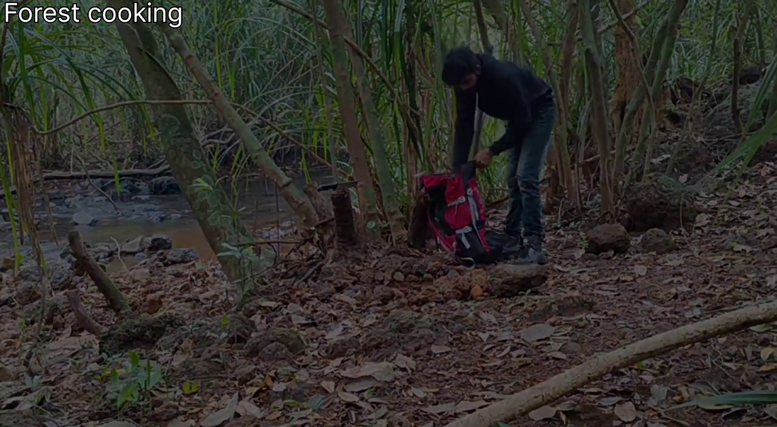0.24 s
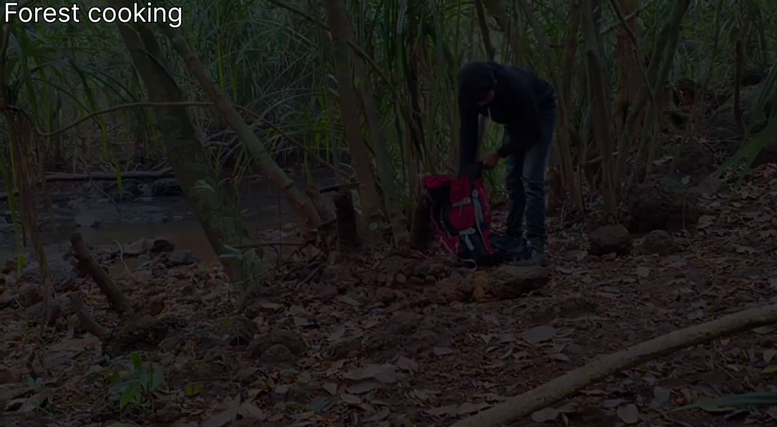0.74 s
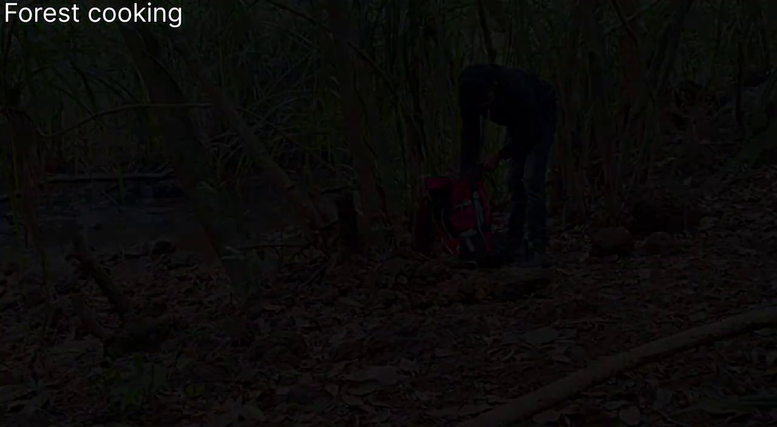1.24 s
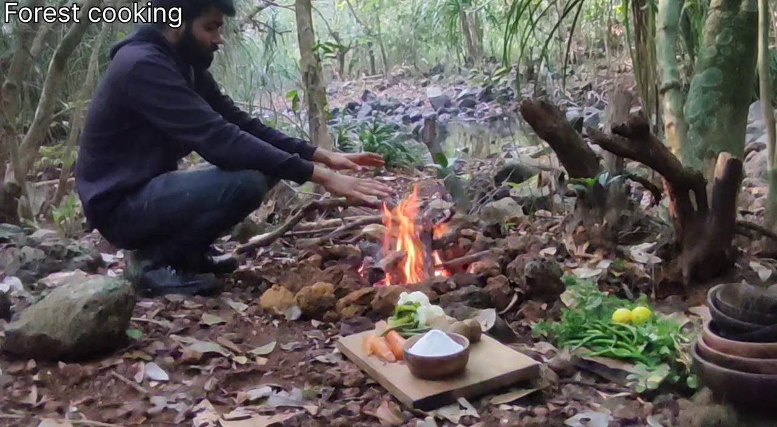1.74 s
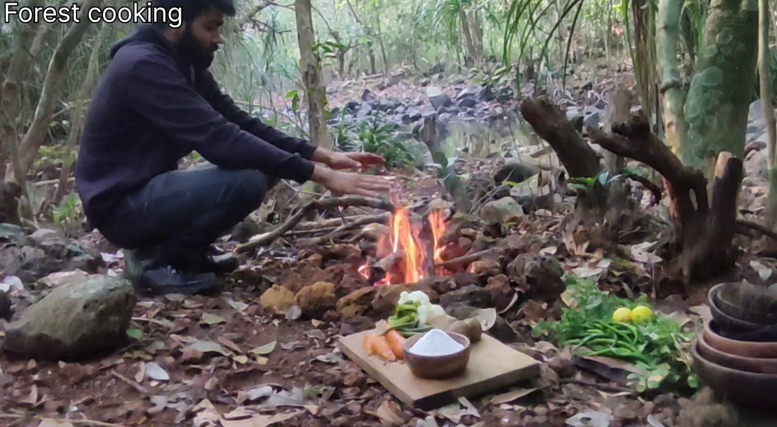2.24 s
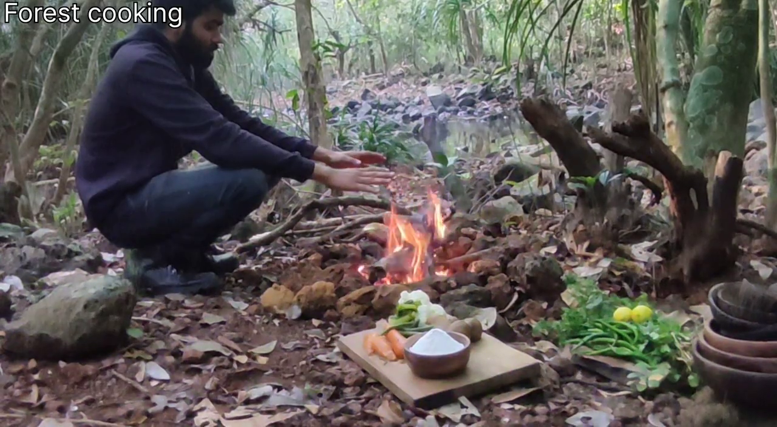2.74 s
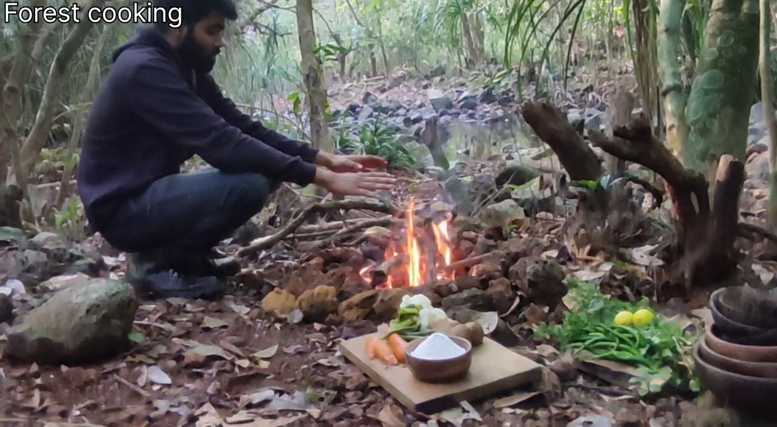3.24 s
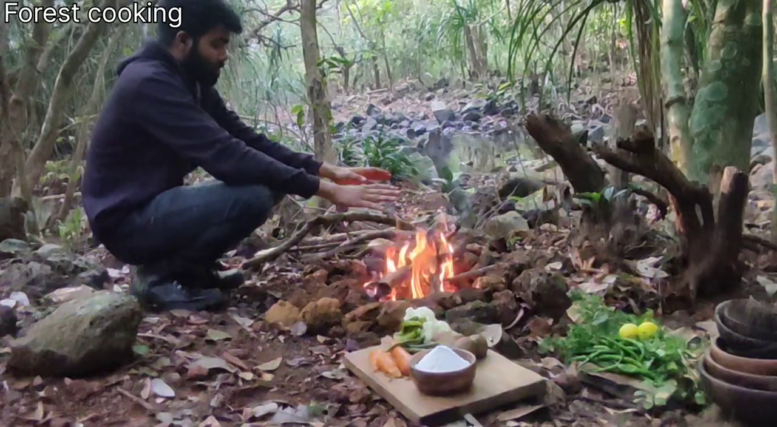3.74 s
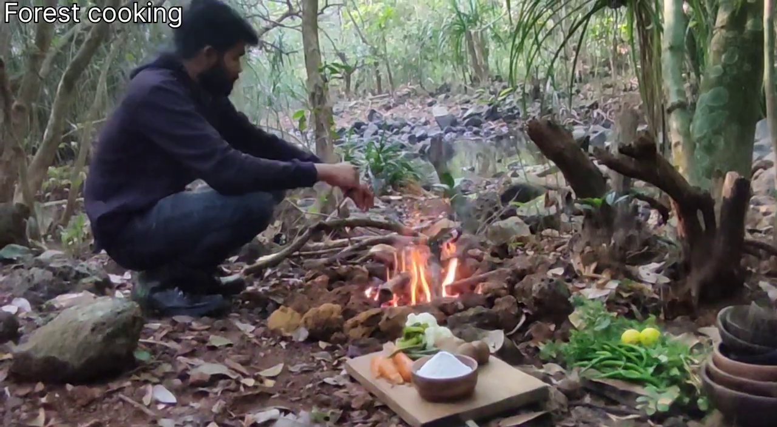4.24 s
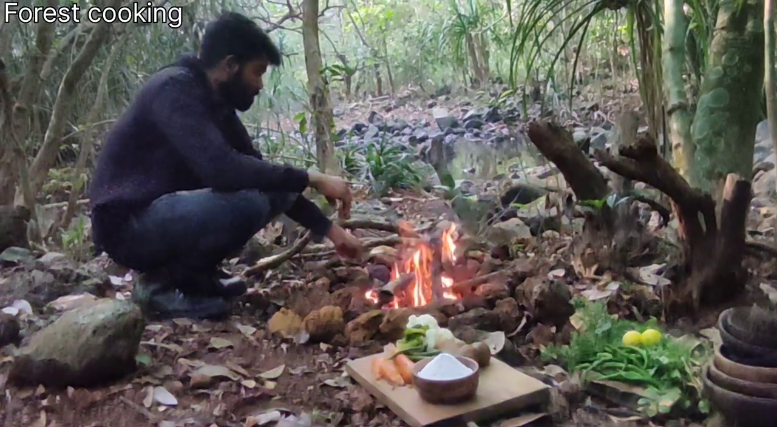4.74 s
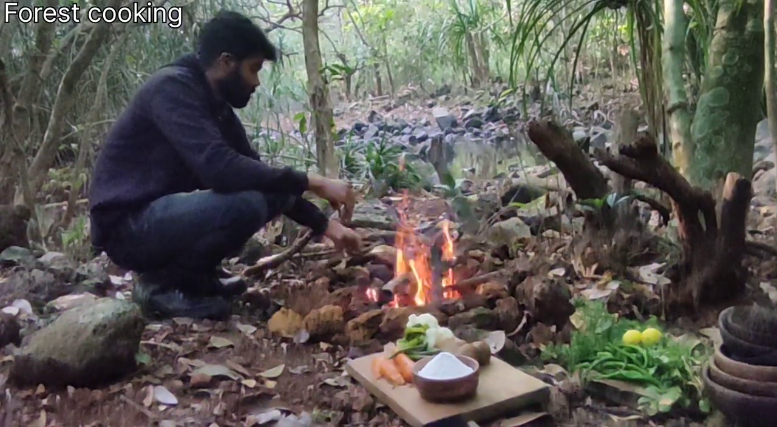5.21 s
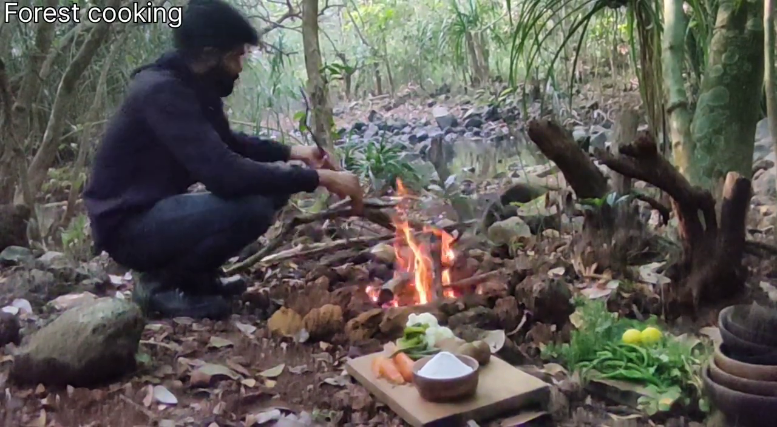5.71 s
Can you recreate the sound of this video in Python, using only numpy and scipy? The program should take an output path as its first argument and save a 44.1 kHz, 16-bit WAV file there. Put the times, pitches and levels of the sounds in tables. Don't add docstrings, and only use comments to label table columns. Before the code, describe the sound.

Thin, bright insect chorus and soft water noise fill a quiet forest, picked up by a small stereo microphone near the ground. The sound drops out briefly before two seconds and quickly fades back with surging insects. Far birds whistle and chirp, a small nearby fire flutters and ticks, and finally much louder hollow wooden knocks and crisp leaf scraping burst in close.

```python
import sys
import numpy as np
from scipy import signal
from scipy.io import wavfile
from scipy.ndimage import uniform_filter1d

SR = 44100
rng = np.random.default_rng(int(sys.argv[2]) if len(sys.argv) > 2 else 0)


def store_pcm(level_fs):
    pcm = np.round(np.clip(level_fs, -1, 1) * 32767).astype(np.int16)
    wavfile.write(sys.argv[1], SR, np.atleast_2d(pcm).T)


def volts_from_db(level):
    exponent = np.asarray(level, float) / 20
    return 10 ** exponent


N = 263277


def rms_one(x):
    return x / np.sqrt(np.mean(x ** 2) + 1e-20)


def in_time(rows, span):
    s, *columns = np.transpose(rows)
    t = np.arange(round(span[0] * SR), round(span[1] * SR)) / SR
    return [np.interp(t, s, column) for column in columns]


def at_hz(points, hz):
    points = np.array(points)
    return np.interp(np.log(hz), np.log(np.maximum(points[:, 0], 1)), points[:, 1])


def sides(left_right_db):
    return volts_from_db(np.multiply.outer([.5, -.5], left_right_db))


def steady(span, rows):
    t = np.arange(round(span[1] * SR) - round(span[0] * SR)) / SR
    return [db + per_s * t for db, per_s in rows]


def drift(rate, size):
    r = np.exp(-80 * np.pi * rate / SR)
    slow = signal.lfilter([1], [1, -2 * r, r * r], rng.standard_normal((2, size // 40 + 1002)))
    slow = slow[:, 1000:]
    return np.array([np.interp(np.arange(size) / 40, np.arange(len(row)), rms_one(row)) for row in slow])


def ring(x, hz, t60):
    r, w = volts_from_db(-60 / (t60 * SR)), 2 * np.pi * hz / SR
    return signal.lfilter([1, 0, -1], [1, -2 * r * np.cos(w), r * r], x + 1e-18)


def band(x, low_hz, high_hz):
    return signal.sosfilt(signal.butter(2, [low_hz, high_hz], "band", fs=SR, output="sos"), x)


def add(out, s, x):
    i = round(s * SR)
    out[:, i:i + x.shape[1]] += x[:, :N - i]


def wash(spectrum, like, lean, size, patchy_db, count):
    out = 0
    edges = np.geomspace(spectrum[1][0] / 1.322, spectrum[-3][0] * 1.143, count + 1)
    white = rng.standard_normal((2, 2, size))
    together = 0.76 * drift(3.36, size)[0]
    for k, (low, high) in enumerate(zip(edges, edges[1:])):
        mid, side = band(white[k % 2], low, high)
        hz = np.sqrt(low * high)
        alike = np.clip(at_hz(like, hz), -1, 1)
        flicker_db = patchy_db * (drift(14.8, size) + together)
        gain = volts_from_db(at_hz(spectrum, hz) + flicker_db) * sides(at_hz(lean, hz))[:, None]
        out = out + gain * (np.sqrt(1 + alike) * mid + np.sqrt(1 - alike) * side * [[1], [-1]])
    return rms_one(out)


# pitch_hz, level_db (per Hz)
RUMBLE_A = [(7.1, -37), (12, -2), (60, -16.5), (168, -24), (257, -28), (450, -32.5), (580, -66),
            (990, -120)]
RUMBLE_B = [(7.1, -6), (12, -14.5), (19, -1), (33, -6.5), (156, -12.5), (450, -37.5), (580, -66),
            (990, -120)]
# pitch_hz, level_db (per Hz)
STREAM_A = [(210, -16), (350, -21), (411, -30), (568, -1.5), (1150, -2), (2750, -3.5), (5500, -5),
            (7150, -35), (12100, -120)]
STREAM_B = [(180, -14), (300, -9.5), (333, -7), (879, -3.5), (1090, -2.5), (1340, -6.5), (2320, 0.5),
            (3290, -6), (4900, -2), (6370, -36), (10800, -120)]
# pitch_hz, level_db (per Hz)
LEAF_HISS = [(5000, -42), (7400, 5), (8600, 3), (10000, -1), (13000, 1), (15400, 0), (16500, -24),
             (17000, -40)]
# pitch_hz, likeness (-1 to 1)
LIKE_A = [(60, 0.36), (240, 0.46), (950, -0.17), (3770, 0.032), (15000, 0.005)]
LIKE_B = [(60, 0.81), (240, 0.65), (950, -0.011), (3770, -0.13), (15000, 0.019)]
# pitch_hz, left_right_db
LEAN_A = [(60, -1.2), (180, 0.07), (550, -0.52), (1650, 1.0), (4970, 0.079), (15000, -0.076)]
LEAN_B = [(60, -1), (180, 1.5), (550, -1), (1650, 4.5), (4970, 0), (15000, -1)]
# level_db, trend_db_per_s
AIR_A = [
    (-61.5, -2.5),
    (-69, 0.23),
    (-75, 1.4),
]
AIR_B = [
    (-65.5, 0.079),
    (-67.5, 0.19),
    (-75, 0.0093),
]
# time_s, change_db
GUSTS = [(0, 4.5), (.4, 1), (1.25, -1.5), (1.7, 1.5), (1.77, -7.5), (2.2, 3.5), (2.54, -0.2), (2.8, 1.5),
         (3.25, 2.5), (3.55, 1.7), (3.95, -0.9), (4.7, 3), (5.03, 0.1), (5.48, 2.2), (5.68, 2), (5.97, 5.5)]
STREAM_FOLLOWS, HISS_FOLLOWS = 0.67, 0.81
BREEZE_DB = -57


def air(span, levels, rumble, stream, like, lean):
    rumble_db, stream_db, hiss_db = steady(span, levels)
    (gust_db,) = in_time(GUSTS, span)
    size = len(hiss_db)
    low = volts_from_db(rumble_db + 7.0) * wash(rumble, like, lean, size, patchy_db=3.0, count=6)
    stream_gain = volts_from_db(stream_db + STREAM_FOLLOWS * gust_db + 7.0)
    middle = stream_gain * wash(stream, like, lean, size, patchy_db=2.0, count=11)
    hiss_gain = volts_from_db(hiss_db + HISS_FOLLOWS * gust_db + 10.0)
    high = hiss_gain * wash(LEAF_HISS, like, lean, size, patchy_db=1.5, count=10)
    breeze = volts_from_db(BREEZE_DB) * drift(6.2, size)
    return low + middle + high + breeze


def note(s, length, hz, db, lean_db, shape):
    attack, release, edge_db, sag_db, glide = shape
    at = np.maximum.accumulate([0, attack, length - release, length])
    level_db = db - np.array([edge_db, 0, sag_db, sag_db + edge_db])
    return np.transpose([s + at, hz + glide * at, level_db, lean_db + 0 * at])


def bird(rows, overtones, rough, flutter):
    hz, level_db, lean_db = in_time(rows, (rows[0][0], rows[-1][0]))
    phase, size = 2 * np.pi * np.cumsum(hz) / SR, len(hz)
    from_end = np.minimum(np.arange(size), np.arange(size)[::-1])
    fade = np.minimum(1, from_end / (0.0041 * SR))
    out = 0
    for multiple, db in overtones:
        scattered = 1 - rough + rough * (drift(flutter, size) + 1j * drift(flutter, size))
        turning = np.exp(1j * (round(multiple) * phase + [[0], [1.9]]))
        out = out + volts_from_db(db) * np.real(scattered * turning)
    return np.sqrt(2) * volts_from_db(level_db + 5.5) * fade * sides(lean_db) * out


# start_s, length_s, pitch_hz, level_db, left_right_db
HOOT = [
    (0.13, .33, 574, -64, 19),
]
# multiple, level_db
HOOT_OVERTONES = [
    (1, -4),
    (2, -12.5),
    (3, -18.5),
]
# start_s, length_s, pitch_hz, level_db, left_right_db
PIPES = [(.44, .12, 1140, -77, 11), (.54, .14, 1150, -77, 8), (.095, .04, 1285, -70, 9),
         (2.814, 0.03, 1520, -59.5, 8), (2.842, 0.044, 1540, -60, 5), (2.918, 0.042, 1517, -69, -6),
         (2.975, 0.068, 1520, -70, 3), (2.922, 0.034, 2985, -64, -4), (2.97, 0.071, 2970, -67.5, -2),
         (3.038, 0.029, 3140, -61, -7), (3.062, 0.024, 3100, -66, -4), (3.085, 0.03, 3120, -66, -3),
         (3.074, .025, 1855, -66, 0), (3.1, .025, 1860, -70, -1), (3.125, 0.068, 1885, -65.5, 7),
         (3.17, 0.049, 1885, -63, 4), (3.217, 0.076, 1940, -63.5, 4), (3.287, 0.035, 1935, -64, 3),
         (3.318, .025, 1930, -64, 0), (3.345, 0.034, 1890, -65, 1), (3.4, 0.05, 1920, -74, 5),
         (5.345, .03, 1220, -70, -4), (5.362, 0.036, 1135, -63.5, 2), (5.388, 0.037, 1130, -63, -2),
         (5.425, .035, 1147, -63, 0), (5.452, 0.037, 1175, -61, 4), (5.492, 0.047, 1173, -68, 3),
         (5.565, 0.031, 1170, -71, 10)]
# start_s, length_s, pitch_hz, level_db, left_right_db
CHIRPS = [
    (2.11, 0.11, 3710, -54, -1),
    (3.476, 0.076, 3420, -57.5, -8),
    (3.475, 0.1, 4120, -54.5, 4),
    (3.725, 0.093, 2380, -55.5, 11),
    (3.781, 0.1, 2480, -57.5, 10),
]
# attack_s, release_s, edge_db (under top), sag_db, glide_hz_per_s
HOOT_SHAPE = (.2, .06, 15, 5, -35)
PIPE_SHAPE = (.01, .012, 12, 2, -60)
CHIRP_SHAPE = (0.024, 0.023, 20, 6.8, 290)


def distant_birds():
    out = np.zeros((2, N))
    for row in HOOT:
        add(out, row[0], bird(note(*row, HOOT_SHAPE), HOOT_OVERTONES, rough=0.33, flutter=18))
    for row in PIPES:
        add(out, row[0], bird(note(*row, PIPE_SHAPE), [(1, 0)], rough=0.36, flutter=80))
    for row in CHIRPS:
        chirp = bird(note(*row, CHIRP_SHAPE), [(1, 0)], rough=0.73, flutter=240)
        add(out, row[0], volts_from_db(-11.5) * chirp)
    return out


# start_s, peak_db, pitch_hz
FLAPS = [(1.842, -50.5, 132), (1.944, -48.5, 75.4), (2.045, -57, 72.7), (2.382, -53, 72.7),
         (2.592, -48, 108), (2.84, -56, 75.4), (3.139, -53, 108), (3.467, -56, 143), (3.632, -55, 118),
         (3.739, -52, 129), (4.126, -55, 72.7), (4.38, -54, 113), (4.475, -54, 118), (4.57, -60, 96.9),
         (4.667, -52, 88.8), (5.005, -48, 165), (5.319, -53, 108), (5.515, -52, 86.1), (5.663, -60, 72.7),
         (5.773, -53, 72.7)]
FLAP_CYCLES, FLAP_DB = 4.8, -3.5


def flame():
    out = np.zeros((2, N))
    for s, peak_db, hz in FLAPS:
        t = np.arange(SR // 8) / SR
        age = t * hz / FLAP_CYCLES * np.log(1000)
        puff = np.e * age * np.exp(-age) * np.sin(2 * np.pi * hz * t)
        add(out, s - .003, volts_from_db(peak_db + FLAP_DB) * puff * np.ones((2, 1)))
    return out


def snap(peak_db, top_db, dull_db, lean_db):
    tail_s, echo_db = .075, -12
    t = np.arange(SR // 5) / SR
    echoes = volts_from_db(echo_db - 60 * t / tail_s) * np.minimum(1, t / 0.0042)
    shape = volts_from_db(-60 * t / 0.0073) + echoes
    noise = rng.standard_normal(len(t)) + 2 * rng.standard_normal((2, len(t)))
    burst = shape * noise
    crack = band(burst, 6600, 8500)
    top = volts_from_db(top_db + 2.5) * band(band(burst, 8600, 16000), 11200, 16500)
    dull = volts_from_db(dull_db - 2.5) * band(burst, 2500, 5000)
    return volts_from_db(peak_db) * sides(lean_db)[:, None] * (crack + top + dull)


# start_s, peak_db, top_db, dull_db, left_right_db
SNAPS = [(0.533, -58, -4, -8, 7), (1.802, -60, -24, -10, -0.5), (2.4346, -52, 3, 9, 0),
         (3.6254, -53, -4, -10, -1), (4.218, -56, -5, -9, 6), (4.2295, -51, 2, -8, 0),
         (4.305, -58, -4, -11, -4), (4.453, -52, -13, -8, -4), (4.5084, -72, -2.5, -7, -2),
         (4.7127, -57.5, 5, -5, -1.5), (4.9536, -69, 13, 4, -4), (5.1993, -55, -10, -14, 2),
         (5.75, -55, 2, 6, 5), (5.7745, -44, -8, -6, -4), (5.7768, -34.5, -10, -6, -8),
         (5.7788, -34.5, -21, -6, -8), (5.7845, -44, -15, -9, -3), (5.7897, -34.5, -14, -8, -5),
         (5.968, -32.5, -14, -14, 9)]
# start_s, peak_db, pitch_hz, left_right_db
TICKS = [(2.9, -58, 6500, 8), (2.7302, -58, 7000, 8), (3.7893, -56, 7020, -4), (5.862, -51, 7300, 14),
         (5.875, -60, 7450, 8), (5.198, -57, 9500, 4), (5.199, -65, 10900, 4), (4.2295, -58, 9200, 0),
         (4.317, -65, 10200, -5), (5.889, -58, 8000, 0)]


def fire_and_twigs():
    out = np.zeros((2, N))
    for s, *how in SNAPS:
        add(out, s, snap(*how))
    decay = volts_from_db(-60 * np.arange(SR // 10) / SR / 0.079)
    for s, peak_db, hz, lean_db in TICKS:
        burst = rng.standard_normal((2, SR // 10)) * decay
        add(out, s, volts_from_db(peak_db + 14.5) * band(burst, hz - 600, hz + 600) * sides(lean_db)[:, None])
    return out


STICK_MOVES_S, STICK_LANDS_S = 5.6, 5.776


def stick_on_leaves(since):
    brush_db, crush_db, drag_db, hold_s, fade_db_per_s = -63.5, -48, -58.5, 0.021, 116
    crush_fading_db = crush_db - fade_db_per_s * np.maximum(since - hold_s, 0)
    leaf_db = np.where(since < 0, brush_db, np.maximum(drag_db, crush_fading_db))
    size = len(since)
    grains = (rng.random((2, size)) < 11000 / SR) * rng.normal(0, 1, (2, size))
    rustle = band(band(grains, 5000, 9100), 5000, 8800)
    rustle = rustle + volts_from_db(-10.0) * band(grains, 1630, 5600) + volts_from_db(-11.5) * band(grains, 9000, 14500)
    return volts_from_db(leaf_db + 4.0) * rms_one(rustle) * sides(1.9)[:, None]


# start_s, peak_db, pitch_hz (favoured)
KNOCKS = [(5.698, -61, 640), (5.729, -57, 680), (5.749, -55, 660), (5.762, -57, 680), (5.7795, -40, 680),
          (5.7796, -42, 520), (5.7797, -48, 400), (5.7867, -41.5, 690), (5.798, -52, 710),
          (5.827, -38.5, 700), (5.846, -51, 640), (5.862, -56, 640), (5.873, -46, 640), (5.884, -46.5, 647),
          (5.896, -49, 770), (5.911, -48, 705), (5.924, -45, 676), (5.934, -48, 800), (5.946, -39.5, 765),
          (5.9475, -45, 620), (5.947, -47, 400), (5.96, -43, 630)]
# pitch_hz, level_db, t60_s
LOG = [(400, -14, .03), (550, -14, .04), (635, -9, .08), (695, -8, .05), (765, -10, .055), (1060, -22, .03),
       (1230, -20, .03)]


def stick_on_log(since):
    rub_db = -65.5 + since * np.where(since < 0, 75, 34)
    start_s, peak_db, favoured_hz = np.transpose(KNOCKS)
    at = [round((s - STICK_MOVES_S) * SR) for s in start_s]
    log = 0
    for hz, mode_db, t60 in LOG:
        contact = np.array([np.zeros(len(since)), rng.standard_normal(len(since))])
        miss_db = 0.3 * np.minimum(np.abs(favoured_hz - hz), 150)
        contact[0, at] = volts_from_db(peak_db + 3.0 - miss_db)
        soft = band(band(contact, 370, 800), 360, 1300)
        log = log + volts_from_db(mode_db) * ring(soft, hz, t60)
    knocks = log[0] * volts_from_db(peak_db.max() - 2.5) / np.abs(log[0]).max()
    return knocks + volts_from_db(rub_db) * rms_one(log[1])


def stick():
    since_landing = np.arange(round(STICK_MOVES_S * SR), N) / SR - STICK_LANDS_S
    return stick_on_leaves(since_landing) + stick_on_log(since_landing)


# level_db (at the start of the take), swell_db_per_s
SINGING_A = [(-64.5, 0.9), (-69.5, 0.5), (-70, 0), (-77.5, -8)]
SINGING_B = [(-62.5, 0.63), (-70, 1), (-75, 0.2)]
# time_s, half_length_s, pitch_hz (of the wing), change_db
BOUTS_A = [
    (0.041, 0.11, 6196, 2),
    (1.01, .05, 6196, 1),
    (2.6, 0.02, 6196, 7),
    (1, 0.072, 8200, -6),
]
BOUTS_B = [(1.76, .22, 5880, -6.5), (1.76, .2, 6740, -2.5), (2.118, 0.086, 6740, 12),
           (2.262, 0.13, 6740, 5.5), (2.122, 0.096, 7810, 8), (2.6, .1, 6740, -3), (2.52, 0.097, 7810, 7),
           (2.74, .04, 6740, 4), (2.85, 0.097, 7810, 6), (2.9, 0.036, 6740, 1), (3.01, .03, 6740, -9),
           (3.12, 0.12, 6740, 6), (3.1, 0.081, 7810, 4), (3.24, .06, 5880, 2), (3.66, .03, 6740, -4),
           (3.8, 0.11, 6740, 1.5), (4.13, 0.092, 7810, -7), (4.88, 0.15, 6740, 6), (4.86, 0.08, 7810, 6),
           (4.9, 0.1, 5880, 2), (5.7, 0.45, 7810, 8.5), (5.9, 0.028, 6740, 1)]


def effort(span, groups, singing, bouts):
    levels = steady(span, singing)
    t = span[0] + np.arange(len(levels[0])) / SR
    for s, half, hz, db in bouts:
        k = np.argmin(np.abs(np.array(groups)[:, 0] - hz))
        levels[k] = levels[k] + db * np.exp(-((t - s) / half) ** 2)
    return levels


# pitch_hz, spread_hz, strokes_per_s, left_right_db, t60_s
CHORUS_A = [
    (6230, 303, 520, 0, 0.016),
    (6780, 175, 170, -7, 0.03),
    (7220, 246, 170, 9, 0.023),
    (8060, 300, 490, 6, 0.0046),
]
CHORUS_B = [
    (5880, 363, 260, 1.5, .012),
    (6740, 454, 220, 4, 0.011),
    (7810, 530, 280, 7.1, 0.0062),
]
OVERTONE_DB = -28.5


def chorus(span, groups, levels, count=5):
    out = 0
    for (hz, spread_hz, per_s, lean_db, t60), level_db in zip(groups, levels):
        size, group = len(level_db), 0
        for place in np.linspace(-1, 1, count):
            rate = per_s * rng.uniform(.7, 1.3) * volts_from_db(.8 * rng.standard_normal((2, size // 64 + 1)))
            rate = np.repeat(rate, 64, axis=1)[:, :size]
            cycle = np.cumsum(rate, axis=1) / SR + rng.random((2, 1))
            strokes = np.diff(np.floor(cycle), prepend=0, axis=1) * rng.normal(0, 1, (2, size))
            wing_hz = hz + spread_hz * place
            voice = ring(ring(strokes, wing_hz, t60), wing_hz, t60)
            group = group + rms_one(voice) * volts_from_db(0.77 * drift(4.7, size) - 4.5 * place ** 2)
        group = rms_one(group)
        overtone = volts_from_db(OVERTONE_DB) * band(group ** 2, 7200, 15500)
        out = out + volts_from_db(level_db + 5) * (group + overtone) * sides(lean_db)[:, None]
    return out


# start_s, end_s
FIRST = (0, 1.7005)
SECOND = (1.7612, 5.97)


def fade_in(x):
    since = np.arange(N) / SR - SECOND[0]
    fade_db = (since >= 0) * -4 * np.clip(1 - since / 0.18, 0, 1)
    opening_db = (since >= 0) * -7 * np.clip(1 - since / 0.045, 0, 1)
    top = band(x, 8800, 17000) * (volts_from_db(.3 * fade_db) - volts_from_db(fade_db))
    return (x * volts_from_db(fade_db) + top) * volts_from_db(opening_db)


def scene():
    out = np.zeros((2, N))
    for span, groups, singing, bouts, *around in [
            (FIRST, CHORUS_A, SINGING_A, BOUTS_A, AIR_A, RUMBLE_A, STREAM_A, LIKE_A, LEAN_A),
            (SECOND, CHORUS_B, SINGING_B, BOUTS_B, AIR_B, RUMBLE_B, STREAM_B, LIKE_B, LEAN_B)]:
        insects = chorus(span, groups, effort(span, groups, singing, bouts))
        add(out, span[0], air(span, *around) + insects)
    out = fade_in(out) + distant_birds() + fire_and_twigs() + flame()
    add(out, STICK_MOVES_S, stick())
    return out


# pitch_hz, margin_db
THINNING = [(1500, -45), (2400, -7), (3300, -3.0), (4500, -2.5), (4950, -5.5), (5130, -3), (5240, 1.5),
            (5380, -4), (5600, -7), (6500, -3), (7300, -2.3), (8300, -4), (8900, .8), (9600, -.1),
            (11000, 0), (15000, -.3)]


def thinned(x):
    hz, _, cells = signal.stft(x, SR, nperseg=2048, noverlap=1536)
    power = np.sum(np.abs(cells) ** 2, axis=0) + 1e-20

    def blur(grid, bins, frames):
        return uniform_filter1d(uniform_filter1d(grid, size=bins, axis=0), size=frames, axis=1)

    near, around = blur(power, 7, 5), blur(power, 45, 7)
    margin_db = 10 * np.log10(np.abs(near / around) + 1e-9) - at_hz(THINNING, hz + 1)[:, None]
    luck = blur(rng.standard_normal(power.shape), 8, 3)
    margin_db += 3.5 * rms_one(luck) - 1.1
    kept = volts_from_db(-50 / (1 + np.exp(np.clip(6 * margin_db, -30, 30))))
    return signal.istft(cells * kept, SR, nperseg=2048, noverlap=1536)[1][:, :N]


# time_s, half_length_s
SPARED = [
    (1.81, .05),
    (4.232, .011),
    (5.203, .007),
    (5.785, .02),
]


def thinned_between_snaps(dry, t):
    whole = sum(np.exp(-((t - s) / half) ** 4) for s, half in SPARED)
    return whole * dry + (1 - whole) * thinned(dry)


# kick, kick_peak_s, sag, sag_peak_s
KICK_AND_SAG = [
    (11.3, 0.085, -12, 0.33),
    (1.1, 0.023, -18, 0.23),
]


def port_offset(t):
    since = np.maximum(t - SECOND[0], 0)
    offset = []
    for kick, rise, sag, fall in KICK_AND_SAG:
        up = kick * (since + 0.0049) / rise * np.exp(1 - since / rise)
        down = sag * (since / fall * np.exp(1 - since / fall)) ** 2
        offset.append(up + down)
    soften = signal.butter(2, 1800, fs=SR, output="sos")
    return signal.sosfilt(soften, np.array(offset) * (t >= SECOND[0])) / 1000


def band_limit(x):
    return signal.sosfilt(signal.butter(12, 15800, fs=SR, output="sos"), x)


def record(dry):
    t = np.arange(N) / SR
    playing = (t < FIRST[1]) | (t >= SECOND[0])
    wet = thinned_between_snaps(dry, t) * playing
    wet = signal.sosfilt(signal.cheby2(10, 50, 16400, fs=SR, output="sos"), wet)
    return band_limit(wet + port_offset(t))


dry = scene()
out = record(dry)
store_pcm(out)
```